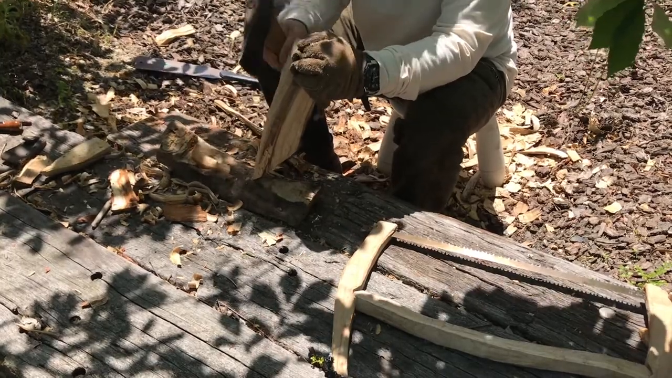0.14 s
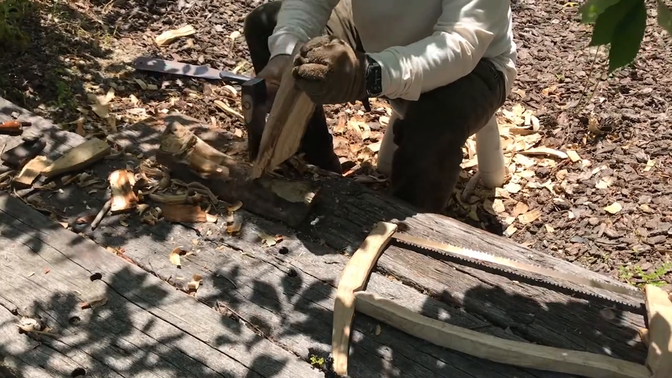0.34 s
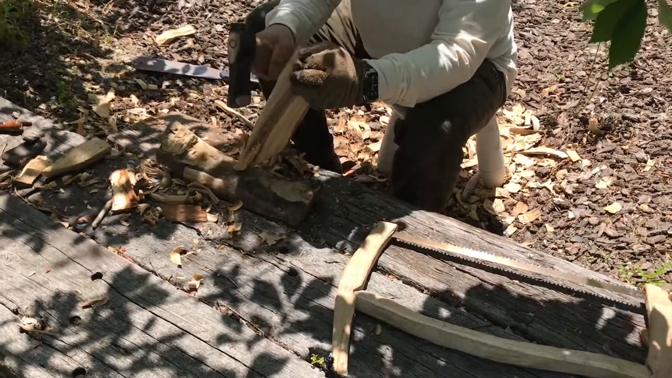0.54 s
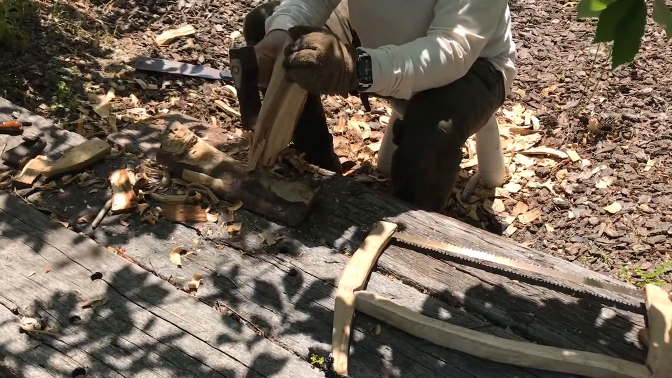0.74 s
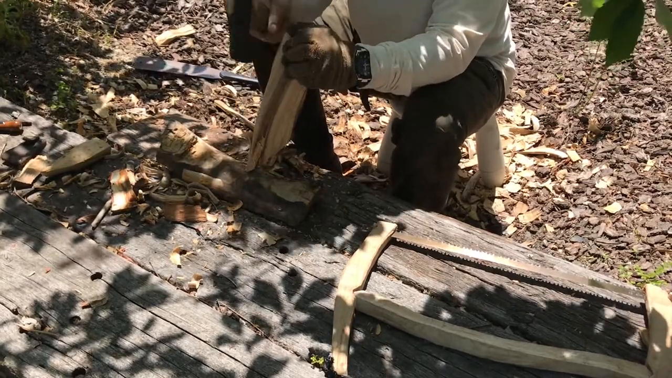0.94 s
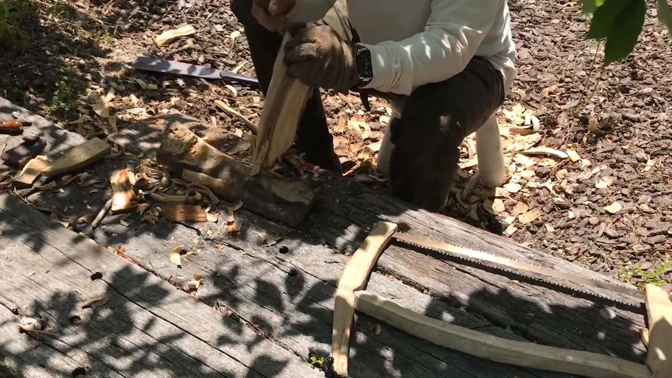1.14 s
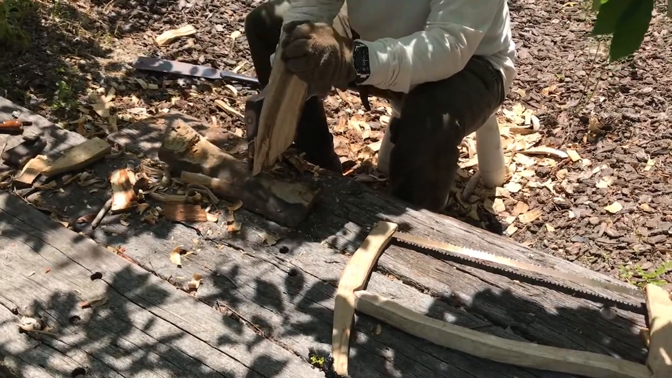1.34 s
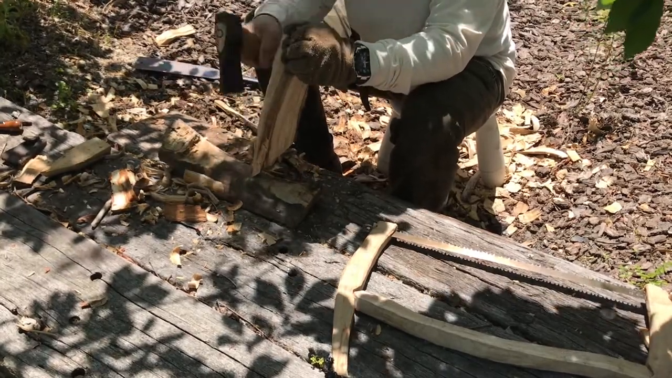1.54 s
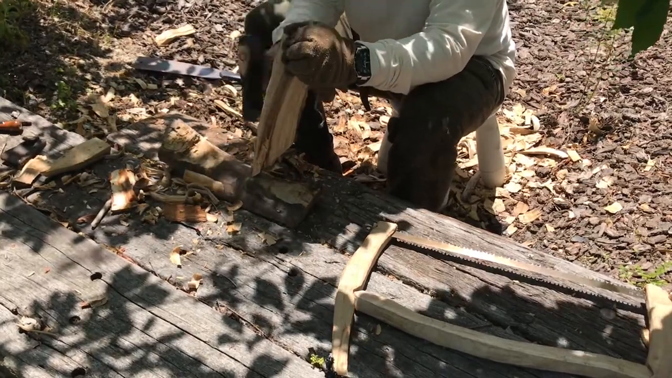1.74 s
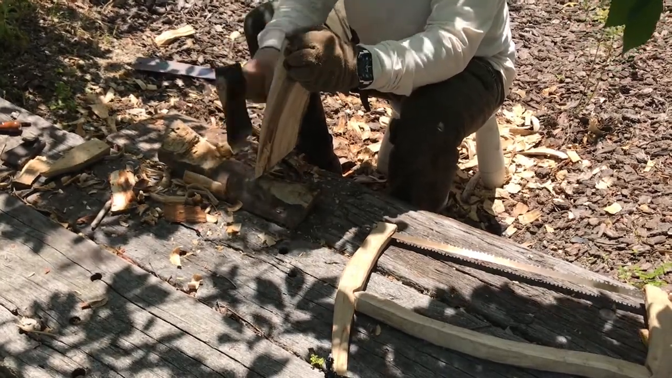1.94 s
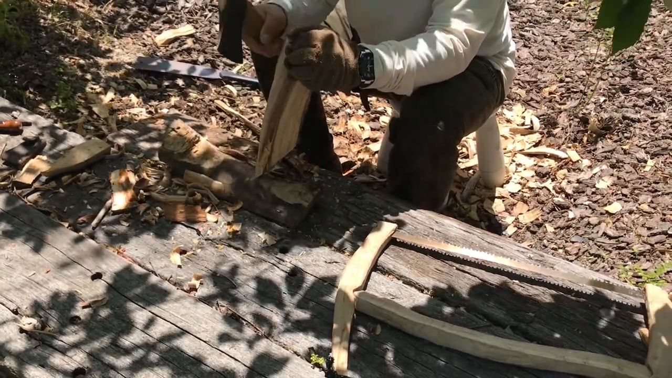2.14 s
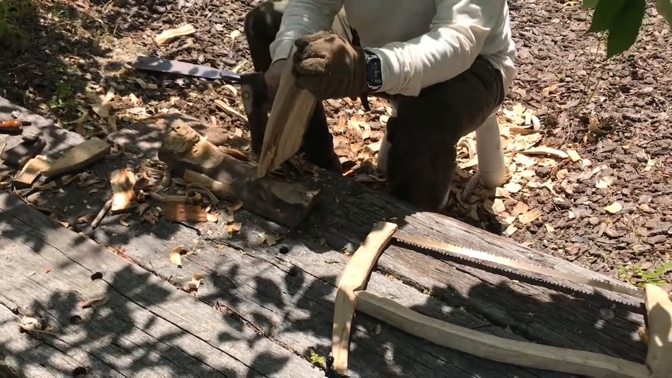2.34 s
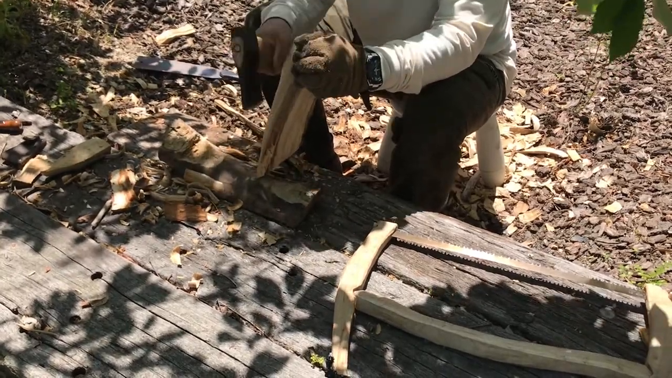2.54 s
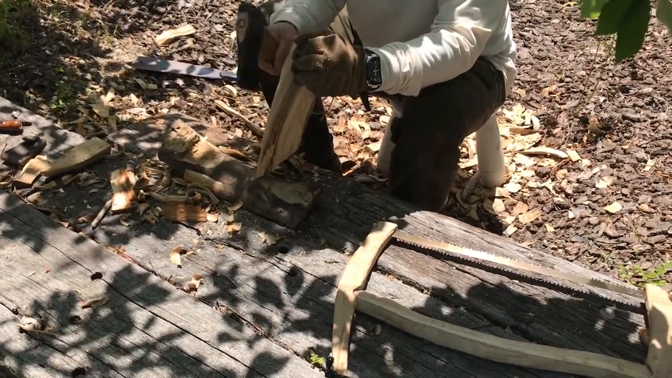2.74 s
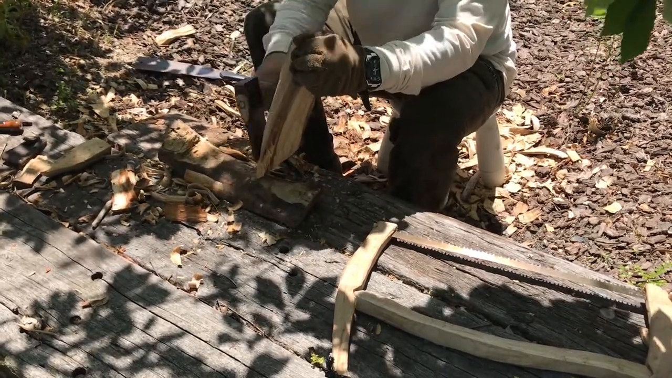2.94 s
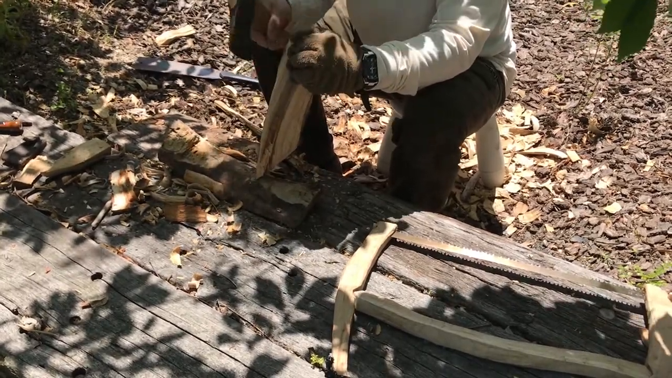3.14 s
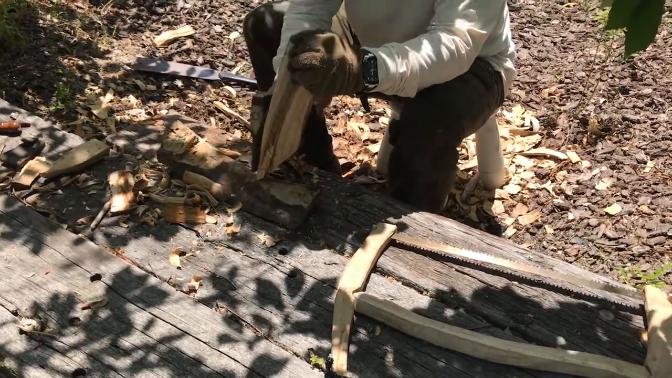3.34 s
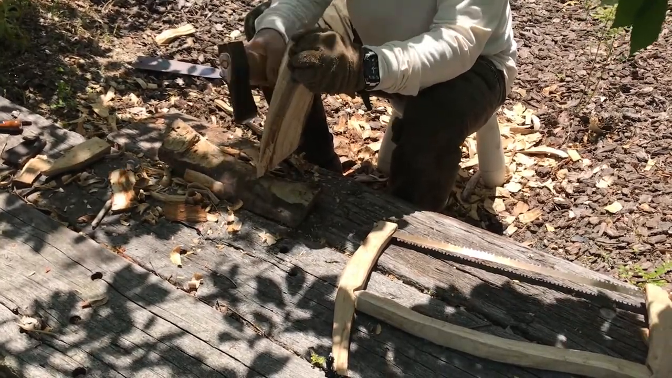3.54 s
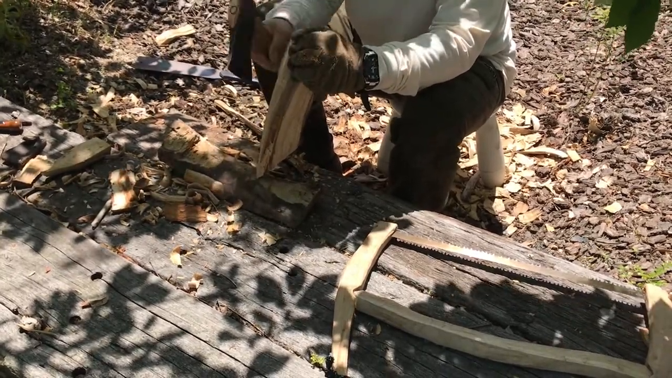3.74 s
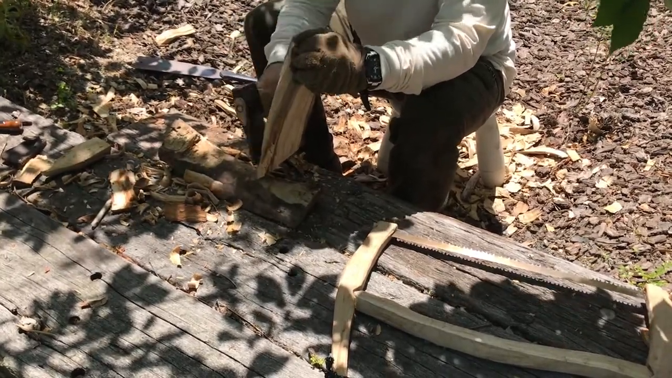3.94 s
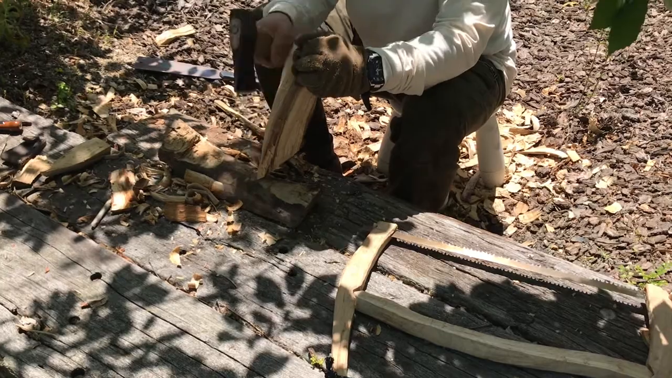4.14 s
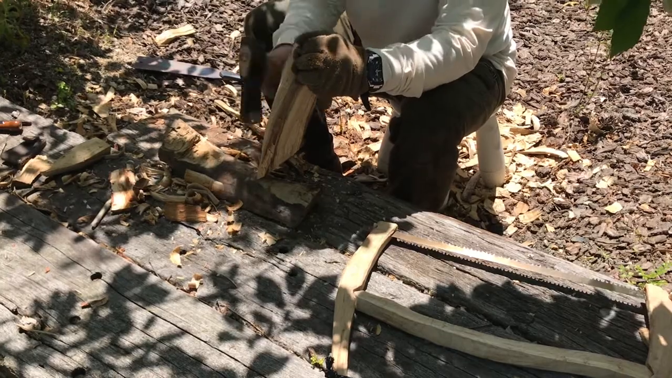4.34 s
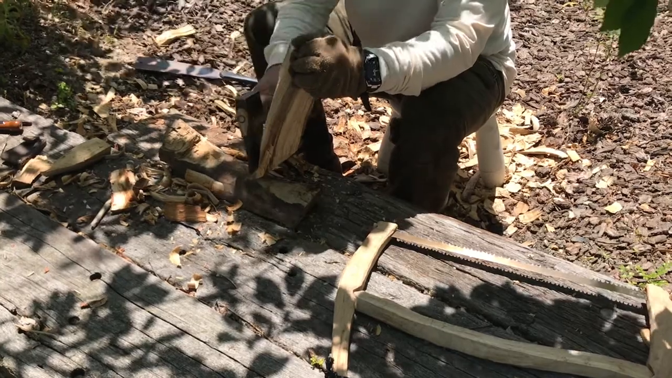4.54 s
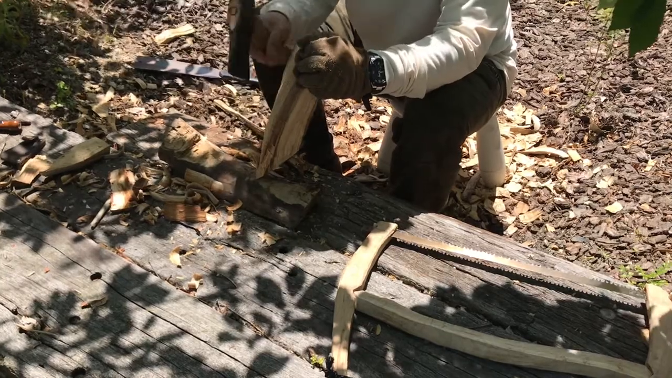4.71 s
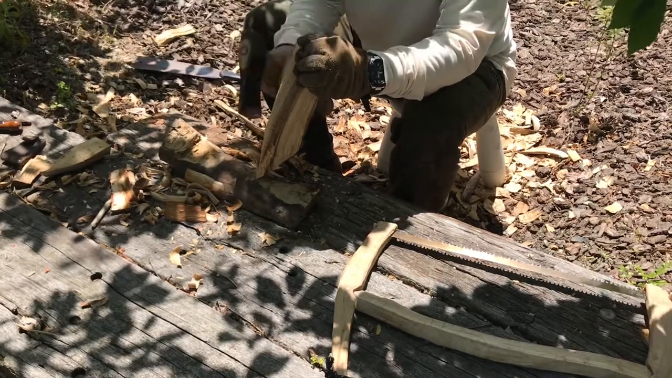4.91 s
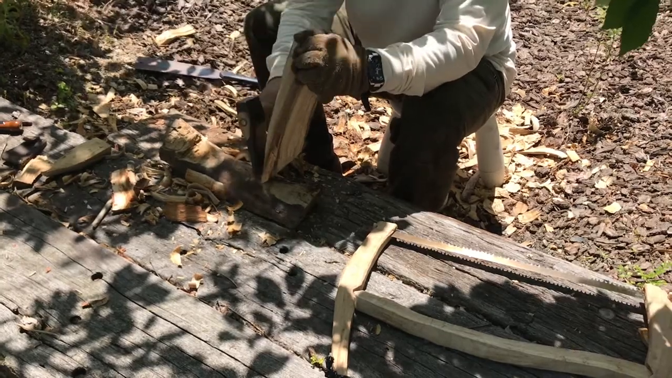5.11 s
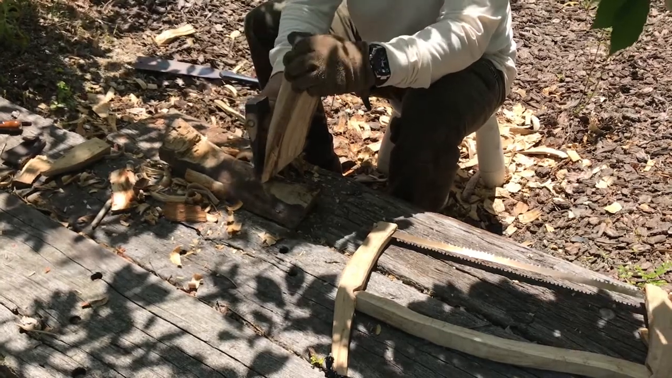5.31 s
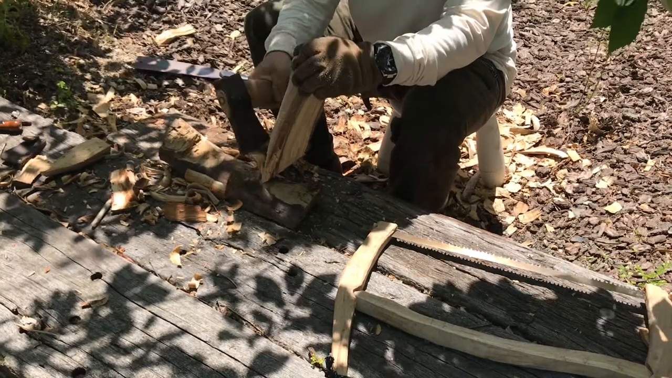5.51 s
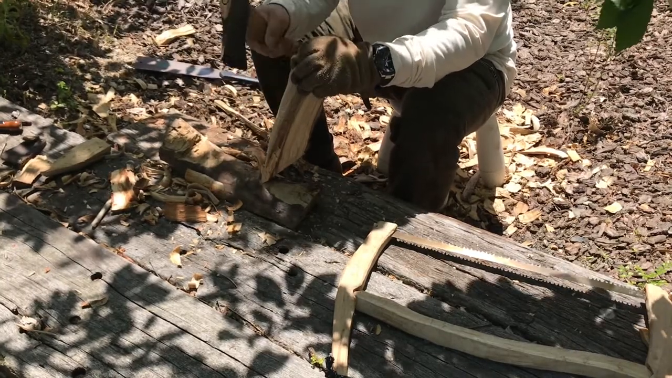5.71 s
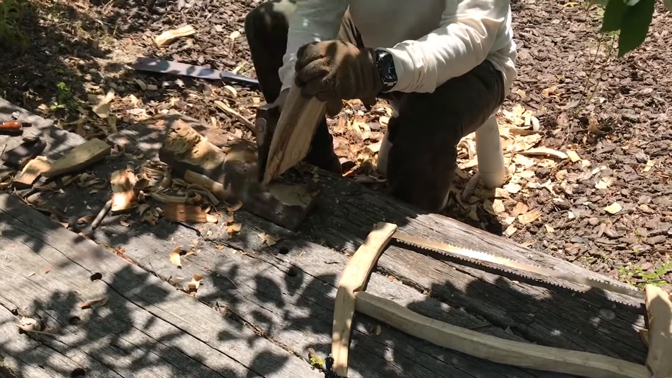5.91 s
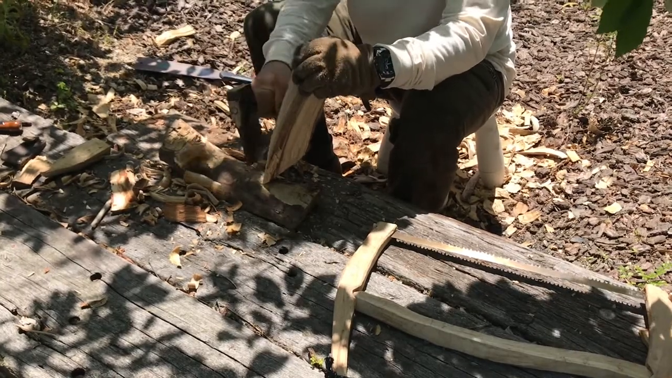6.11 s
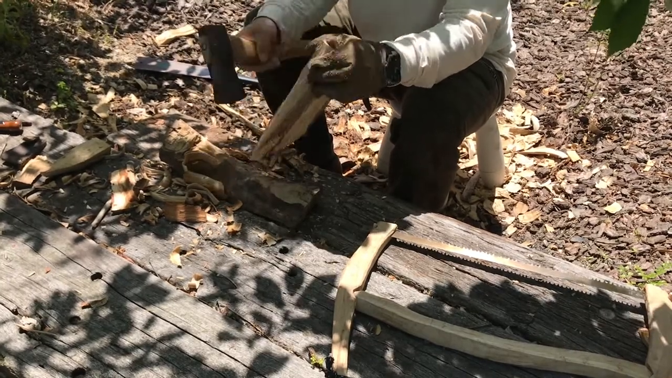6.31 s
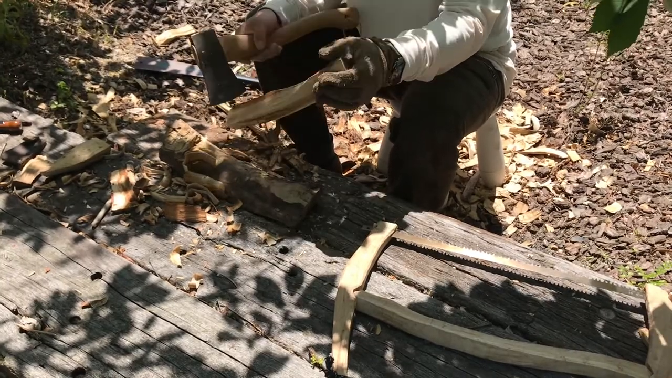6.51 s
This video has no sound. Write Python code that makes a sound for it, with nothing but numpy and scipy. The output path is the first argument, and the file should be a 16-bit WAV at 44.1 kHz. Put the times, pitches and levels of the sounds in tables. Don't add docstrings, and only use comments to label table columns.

```python
import sys
import numpy as np
from scipy import signal
from scipy.fft import rfft, irfft
from scipy.io import wavfile
from scipy.ndimage import uniform_filter1d

SR = 44100
rng = np.random.default_rng(int(sys.argv[2]) if len(sys.argv) > 2 else 0)


def decibels_to_gain(level_db):
    exponent = np.asarray(level_db, float) / 20
    return 10 ** exponent


def persist_wave(psi):
    counts = np.round(np.clip(psi, -1, 1) * 32767).astype(np.int16)
    wavfile.write(sys.argv[1], SR, np.atleast_2d(counts).T)


N = 289296

# pitch_hz, density_db (per Hz)
TRAFFIC_SPECTRUM = [(24, -40), (40, 5), (71, 2), (124, -4), (358, -15), (438, -22.5), (725, -22.5),
                    (1470, -27.5), (2760, -37), (5730, -44), (7010, -46), (7560, -48.5), (10500, -51),
                    (15300, -51.5), (16500, -62.5)]
TRAFFIC_DB = -43.5
# start_s, level_db
ENGINES = [(0.0, -46), (0.88, -55), (1.19, -50.5), (1.83, -48.5), (2.06, -51.5), (2.25, -51), (4.26, -50.5),
           (4.73, -53), (4.99, -50), (5.94, -50), (6.12, -51), (6.56, -51)]
# pitch_hz, width_hz, level_db
CAMERA_WHINE = [
    (7150, 200, -84),
    (15400, 600, -82),
]

# start_s, peak_db, treble_db, t60_s
TEARS = [(0.2337, -17, -22, 0.019), (0.2442, -19, -1, 0.06), (1.3136, -21, -2.5, 0.03),
         (1.319, -23.5, -1, 0.051), (1.331, -28, -0.5, 0.022), (1.339, -26, -7.5, 0.022),
         (1.7983, -20, -9, 0.017), (1.8044, -30, -9.5, 0.031), (1.811, -25, 7, 0.044),
         (1.8192, -14, -21, 0.017), (1.8234, -23, -8.5, 0.076), (2.2933, -22, -3, 0.071),
         (2.826, -20.5, -7, 0.025), (2.833, -20.5, 0, 0.053), (3.339, -31, 0.5, 0.065),
         (3.354, -13.5, -6, 0.042), (3.3591, -34, 3.5, 0.057), (3.8517, -27, -2.2, 0.067),
         (3.8576, -38.5, 7, 0.027), (4.4092, -26, -4.5, 0.078), (4.4139, -20.5, -0.5, 0.03),
         (4.982, -12.5, -9.5, 0.022), (4.9868, -17, -2, 0.06), (5.9274, -18.5, -10.5, 0.064),
         (5.9364, -18, 6, 0.034)]
# start_s, peak_db, treble_db
CRACKS = [
    (0.2474, -20.5, 7),
    (1.3203, -14.5, -8),
    (1.341, -26, 4),
    (1.817, -6, -9),
    (2.2952, -46, -24.5),
    (4.4169, -11.5, -3),
    (4.9894, -11, 6),
    (5.9417, -23.5, 3),
]
# pitch_hz, width_hz, level_db
FIBRE_BODY = [
    (2400, 4500, 4),
    (3456, 650, 16.5),
    (5230, 2400, 9.5),
    (7270, 2300, 10),
    (950, 820, 10),
]
# pitch_hz, width_hz, level_db
SPLINTER_BODY = [
    (8830, 960, 6.5),
    (11690, 1600, 7),
    (14600, 4500, 4),
]
TEAR_RISE_S = 0.0022
CRACK_RISE_S, CRACK_T60_S = 0.0013, 0.019

# start_s, peak_db
JOLTS = [(0.2345, -22.5), (1.3204, -38), (1.7986, -19.5), (1.8164, -42), (2.2981, -17), (2.827, -23),
         (3.3363, -34), (3.3605, -34), (3.8514, -25.5), (4.416, -47), (4.9834, -42), (5.9386, -19.5)]
# pitch_hz, level_db, t60_s
STEEL_MODES = [
    (3045, 1.5, 0.034),
    (4750, -21, 0.049),
    (8600, -20, 0.065),
]
# pitch_hz, width_hz, level_db, t60_s
STEEL_SHIMMER = (3152.5, 702.5, -33.5, 0.36)

# start_s, peak_db, bending_mode_hz, billet_mode_db
BITES = [(0.237, -7, 1220, 0.5), (1.32, -17, 950, 5), (1.343, -2, 1063, -13), (1.8, -7, 1400, 6),
         (1.806, -13, 1330, -11), (1.817, -28, 1010, 23), (2.296, -6.5, 1303, 4.5), (3.339, -15, 1230, 0),
         (4.983, -7.5, 1360, 6), (5.9296, -3.5, 1258, 4), (6.019, -39, 1180, -34)]
# start_s, peak_db, bending_mode_hz, upper_mode_hz, upper_mode_db
CATCHES = [(0.248, -19, 1126, 2243, 13), (0.463, -25.5, 533, 1020, -8.5), (1.315, -28.5, 1187, 1533, -1),
           (1.344, 2, 907, 1415, -9.5), (1.83, -12.5, 1065, 1600, -28.5), (1.8452, -17.5, 773, 1520, -42),
           (2.306, -20, 1360, 1660, -2), (2.827, -14, 1130, 1740, -4.5), (2.839, -18.5, 1280, 2400, -3.5),
           (3.357, -19, 1180, 2260, 26), (3.853, -14, 1360, 1610, 2.5), (3.86, -18.5, 1240, 2320, 5),
           (3.895, -37.5, 1250, 1700, 4), (4.411, -17.5, 1265, 1700, 4.5), (4.416, -17.5, 1253, 2300, -16),
           (4.991, -3.5, 1288, 1708, 3.5), (5.467, -47, 1070, 2270, 6), (5.9311, -4.5, 1187, 1837, 6.5),
           (5.9434, -11, 935, 1450, -3.5), (6.222, -32.5, 1087, 1530, -6)]
# start_s, peak_db, low_mode_hz, upper_mode_db
THUDS = [(0.244, -17.5, 223, -27), (0.25, -21, 147, 2), (0.465, -21.5, 175, -8.5), (1.32, -25, 248, -5),
         (1.3435, 1.5, 198, -2), (1.802, -23.5, 228, -7), (1.818, -21.5, 140, -2.5), (1.832, -19, 120, -4),
         (1.844, -4.5, 196.3, -3.5), (2.297, -18, 160.6, -0.5), (2.3143, -21.5, 197, 1),
         (2.834, -29.5, 207, 18), (2.837, -16.5, 156, -18), (2.868, -26.5, 141, -4), (3.343, -24, 240, -8),
         (3.359, -13, 177.5, -6.5), (3.854, -19.5, 151, 3), (3.863, -13, 153.4, -10),
         (3.896, -24.5, 179, -7.5), (3.921, -34, 208, -19), (4.414, -19, 135.6, -4), (4.418, -8, 172, 3.5),
         (4.454, -33, 214, -14), (4.987, -8, 228, -23), (4.992, -10.5, 194, -5), (5.937, -10, 196, 3),
         (5.9434, -1, 191.6, -2.5)]
# peak_db, t60_s
LOG_DAMPING = [
    (-26.5, 0.054),
    (-15, 0.039),
]
BILLET_HZ, BITE_T60_S = 2000, 0.021
LOG_RATIO = 2.15

# start_s (into call), voice1_hz, voice1_db, voice2_hz, voice2_db
CHEEP_SHAPE = [
    (0, 3000, -11, 6500, -10),
    (.012, 5100, -2, 6500, -19),
    (.022, 4800, 2.5, 6000, -8),
    (.035, 3800, 4, 5300, -11),
    (.05, 3444, 1.5, 4500, -6),
    (.062, 3000, -12, 4200, -18),
    (.08, 2700, -39.5, 3800, -19.5),
]
# start_s, level_db
CHEEP_CALLS = [
    (0.263, -51.5),
    (0.81, -71.5),
    (2.456, -63.5),
    (3.22, -52.5),
    (4.800, -53.5),
    (5.264, -70.5),
    (5.70, -78),
    (6.243, -50.5),
    (6.40, -76),
]
# start_s (into call), voice1_hz, voice1_db, voice2_hz, voice2_db
CHIP_SHAPE = [
    (0, 5780, -17.5, 3130, -13),
    (.006, 5550, -4, 2810, -6.5),
    (.011, 3500, -2, 3960, 1),
    (.017, 3700, -1, 5500, -6.5),
    (.024, 3800, -11, 5400, -8),
    (.032, 3700, -20, 5400, -21),
]
# start_s, level_db
CHIP_CALLS = [
    (1.087, -62.5),
    (2.624, -58),
    (4.014, -59),
    (5.633, -60),
]
PITCH_JITTER = 0.085

# start_s, level_db, treble_db, t60_s
RUSTLES = [(.30, -56.5, -7, 0.98), (.45, -67, -1.5, 0.67), (.54, -62, -5, .2), (.61, -55, -0.6, 0.3),
           (.66, -64, -5, 0.13), (1.024, -60, -4, 0.11), (1.06, -57, -2, 0.075), (1.335, -40, -10.5, 0.18),
           (1.84, -52.5, -15.5, 0.54), (3.87, -57, -6, 0.36), (1.99, -65, -0.5, 0.42), (2.07, -63, 0, 0.17),
           (4.551, -56.5, -6.5, .2), (5.435, -53.5, -3.5, 0.17), (5.55, -66, 3.5, .1),
           (6.0, -64, 2.5, 0.19)]
# start_s, peak_db, treble_db
CHIP_LANDINGS = [(0.379, -52, -1), (0.415, -45.5, -3), (0.459, -38, -11), (0.5029, -46.5, -10),
                 (0.5312, -53, 0), (0.692, -57, 10), (1.366, -55, -15), (1.3904, -38, -12),
                 (1.4144, -55, -20.5), (1.5579, -51.5, -21), (1.8637, -55.5, -8), (1.901, -42, 3),
                 (1.906, -52, 0), (1.9124, -51, 8), (2.101, -69, 17), (2.8684, -56, -7), (3.8954, -58, -20),
                 (3.8998, -44, -22.5), (3.919, -43.5, -12), (3.9594, -53, -5), (4.452, -38.5, -21),
                 (4.966, -59, 8.5), (6.0584, -44, -2), (6.115, -64, 11)]
RUSTLE_RISE_S = 0.027
CHIP_RISE_S, CHIP_T60_S = 0.00087, 0.024

YARD_T60_S, YARD_DB, YARD_HZ = 0.13, -21.5, 3000


def level(x, db):
    return x * decibels_to_gain(db) / np.sqrt(np.mean(x ** 2))


def band(x, hz, width):
    return signal.lfilter(*signal.iirpeak(min(hz, 0.45 * SR), hz / width, fs=SR), x)


def add(out, s, x):
    i = int(s * SR)
    out[i:i + len(x)] += x[:len(out) - i]


def decay(t, t60):
    return np.exp(-np.log(1000) * t / t60)


def ring(hz, t60, t):
    return np.sin(2 * np.pi * hz * t) * decay(t, max(t60, 0.004))


def walk(rate):
    k = int(SR / rate)
    held = np.repeat(rng.standard_normal(N // k + 1), k)
    return 1.3 * uniform_filter1d(uniform_filter1d(held, k), k)[:N]


def town():
    hz = np.fft.rfftfreq(N, 1 / SR)
    f, d = np.transpose(TRAFFIC_SPECTRUM)
    noise = rfft(rng.standard_normal(N)) * decibels_to_gain(np.interp(np.log(hz + 1), np.log(f), d))
    s, engine_db = np.transpose(ENGINES)
    engine_db = np.interp(np.arange(N) / SR, s, engine_db - engine_db.mean())
    rumble = 0
    for centre in range(9, 29):
        share = np.maximum(1 - abs(2 * np.log2(hz + 1) - centre), 0)
        deep = np.clip((16.5 - centre) / 3.3, 0.1, 1)
        rumble = rumble + irfft(noise * share, N) * decibels_to_gain(deep * engine_db + 0.4 * walk(2.7))
    whine = sum(level(band(rng.standard_normal(N), f, w), db) for f, w, db in CAMERA_WHINE)
    return level(rumble, TRAFFIC_DB) + whine


def wood_colour(snaps, body):
    return level(sum((-1) ** k * decibels_to_gain(g) * band(snaps, f, w) for k, (f, w, g) in enumerate(body)), -6)


def crackle(table, spread_db, linger_db):
    low, high, t = np.zeros(N), np.zeros(N), np.arange(SR // 3) / SR
    for s, db, treble_db, rise, t60 in table:
        rise = max(rise, 0.0002)
        fall = -np.log(1000) * np.maximum(t - rise, 0) / max(t60, 0.004)
        shape = np.minimum(t / rise, 1) ** 2 * (np.exp(fall) + decibels_to_gain(linger_db) * np.exp(fall / 4))
        add(low, s, decibels_to_gain(db) * shape)
        add(high, s, decibels_to_gain(db + treble_db) * shape)
    uneven_db = spread_db * uniform_filter1d(rng.standard_normal(N), size=6)
    snaps = level(rng.standard_normal(N) * decibels_to_gain(uneven_db), 0)
    return low * wood_colour(snaps, FIBRE_BODY) + high * wood_colour(snaps, SPLINTER_BODY)


def fibres():
    tears = [(s, db, treble_db, TEAR_RISE_S, t60) for s, db, treble_db, t60 in TEARS]
    cracks = [(*row, CRACK_RISE_S, CRACK_T60_S) for row in CRACKS]
    return crackle(tears, 8.3, -23.0) + crackle(cracks, 16.0, -52.5)


def axe_head():
    pings, fade, t = np.zeros(N), np.zeros(N), np.arange(SR // 4) / SR
    hz, width, shimmer_db, t60 = STEEL_SHIMMER
    for s, db in JOLTS:
        ping = 0
        for mode_hz, mode_db, mode_t60 in STEEL_MODES:
            a, b = rng.standard_normal(2)
            ping = ping + decibels_to_gain(mode_db + 2.0 * a) * ring(mode_hz * (1 + 0.002 * b), mode_t60, t)
        add(pings, s, decibels_to_gain(db) * ping * np.minimum(t / 0.0028, 1))
        add(fade, s, decibels_to_gain(db) * decay(t, t60))
    shimmer = band(band(rng.standard_normal(N), hz, width), hz, width)
    return pings + fade * level(shimmer, shimmer_db)


def knocks(table, push_s, upper_t60, split, rough, swell_s, cut_hz, third):
    out, t = np.zeros(N), np.arange(SR // 8) / SR
    swell = 1 - np.exp(-(t / swell_s) ** 2)
    cut = signal.butter(3, cut_hz, "high", fs=SR, output="sos")
    third_hz, third_db, third_t60 = third
    size = max(int(push_s * SR), 3)

    def pair(hz, t60):
        return ring(hz, t60, t) + 0.31 * ring(hz * split, t60, t)

    for s, db, hz, upper_hz, upper_db, t60 in table:
        push = np.hanning(size) * (1 + rough * rng.standard_normal(size))
        strayed_hz = third_hz * (1 + 0.051 * rng.standard_normal())
        body = swell * pair(hz, t60)
        body = body + decibels_to_gain(upper_db) * np.sqrt(swell) * pair(upper_hz, t60 * upper_t60)
        body = body + decibels_to_gain(third_db) * np.sqrt(swell) * pair(strayed_hz, third_t60)
        body = signal.sosfilt(cut, np.convolve(body, push))
        add(out, s, -body * decibels_to_gain(db) / abs(body).max())
    return out


def blows():
    bites = [(s, db, hz, BILLET_HZ, billet_db, BITE_T60_S) for s, db, hz, billet_db in BITES]
    bites = sorted(bites + [(*row, BITE_T60_S) for row in CATCHES])
    thuds = []
    for s, db, hz, upper_db in THUDS:
        t60 = np.interp(db, *np.transpose(LOG_DAMPING))
        thuds.append((s, db, hz, hz * LOG_RATIO, upper_db, t60))
    billet = knocks(bites, push_s=0.00037, upper_t60=0.69, split=1.084, rough=0.65,
                    swell_s=0.00075, cut_hz=540, third=(1600, -10, 0.02))
    log = knocks(thuds, push_s=0.0006, upper_t60=0.79, split=1.3, rough=0.15,
                 swell_s=0.0017, cut_hz=115, third=(620, -18, 0.025))
    return billet + log


def sparrow(shape, calls, flutter_db, overtone_db):
    out, (s, *cols) = np.zeros(N), np.transpose(shape)
    t = np.arange(int(s[-1] * SR)) / SR
    hz1, db1, hz2, db2 = (np.interp(t, s, c) for c in cols)
    edges = np.minimum(np.minimum(t, t[-1] - t) / 0.0018, 1)
    for start, db in calls:
        for hz, voice_db in ((hz1, db1), (hz2, db2)):
            shaking = uniform_filter1d(rng.standard_normal((2, SR // 5)), size=32)
            flutter, jitter = shaking[:, :len(t)] * np.sqrt(32)
            phase = 2 * np.pi * np.cumsum(hz * (1 + PITCH_JITTER * jitter)) / SR
            tone = np.sin(phase) + decibels_to_gain(overtone_db) * np.sin(2 * phase)
            add(out, start, edges * decibels_to_gain(db + voice_db + flutter_db * flutter) * tone)
    return out


def debris():
    rustles = [(s, db, treble_db, RUSTLE_RISE_S, t60) for s, db, treble_db, t60 in RUSTLES]
    chips = [(*row, CHIP_RISE_S, CHIP_T60_S) for row in CHIP_LANDINGS]
    return crackle(chips, 12, -47) + crackle(rustles, 13, -36)


def yard(x, t60, db, dull_hz):
    t = np.arange(SR // 2) / SR
    bass_cut = signal.butter(1, 260, "high", fs=SR)
    noise = signal.lfilter(*bass_cut, rng.standard_normal(len(t)))
    dull = signal.lfilter(*signal.butter(1, dull_hz, fs=SR), noise)
    tail = dull + 0.5 * noise * np.exp(-t / 0.022)
    tail = tail * decay(t, t60) * np.minimum(t / 0.001, 1)
    return x + decibels_to_gain(db) * signal.fftconvolve(x, tail / np.sqrt(np.sum(tail ** 2)))[:N]


def scene():
    work = fibres() + axe_head() + blows()
    birds = sparrow(CHEEP_SHAPE, CHEEP_CALLS, 4, -24) + sparrow(CHIP_SHAPE, CHIP_CALLS, 4, -30)
    near = yard(work + debris(), YARD_T60_S, YARD_DB, YARD_HZ)
    leaves = yard(birds, 0.06, 0.5, 9000)
    far = yard(leaves, 0.5, -15, 6000)
    return (near + far + town())[None]


def roll_off(x):
    return signal.sosfilt(signal.butter(12, 16970, fs=SR, output="sos"), x)


def record(dry):
    thin = signal.sosfilt(signal.butter(4, 42, "high", fs=SR, output="sos"), dry)
    thin = signal.sosfilt(signal.ellip(6, 0.5, 30, 15900, fs=SR, output="sos"), thin)
    mix = np.tanh(0.56 * thin) / 0.65
    return roll_off(mix)


dry = scene()
out = record(dry)
persist_wave(out)
```